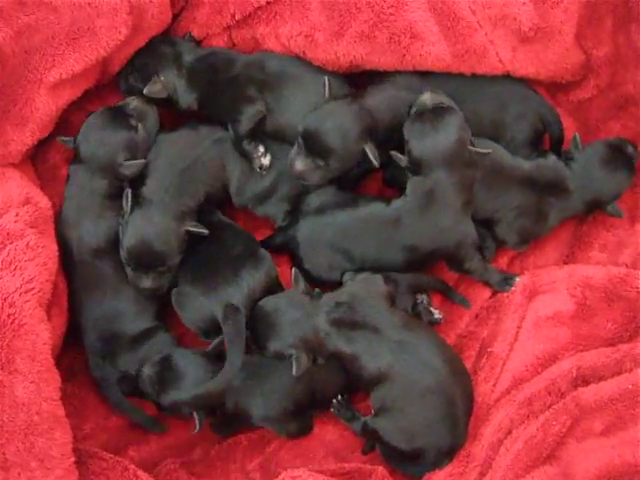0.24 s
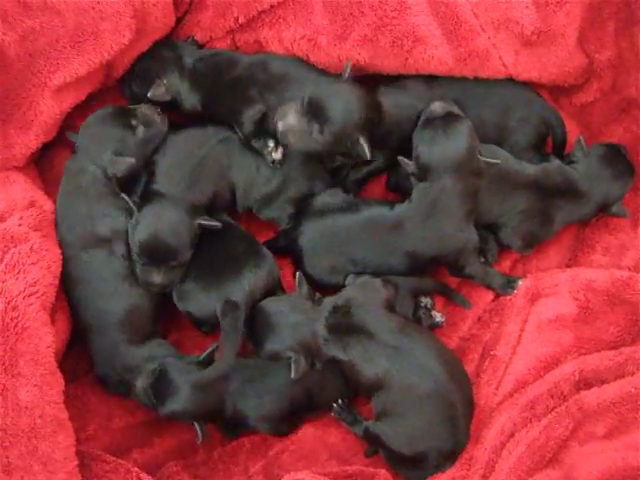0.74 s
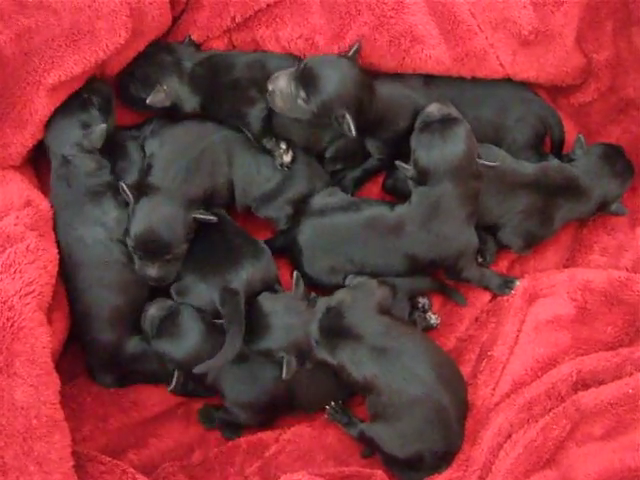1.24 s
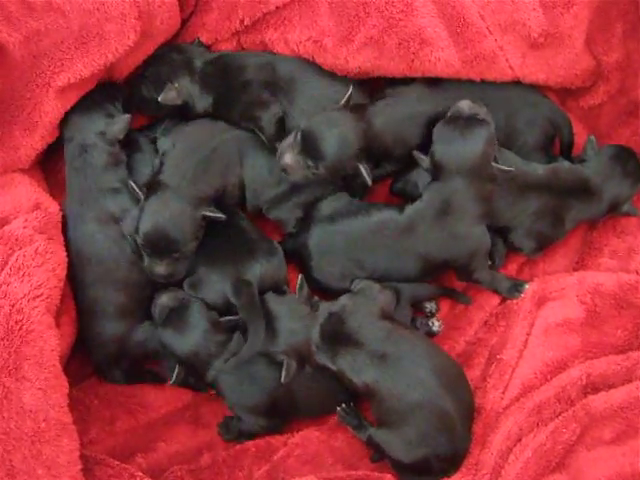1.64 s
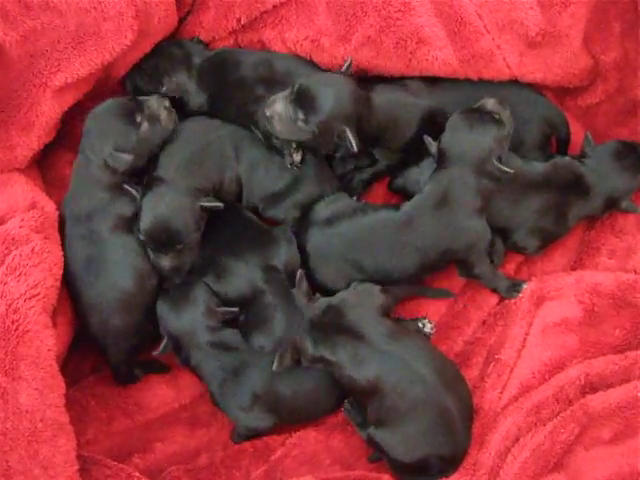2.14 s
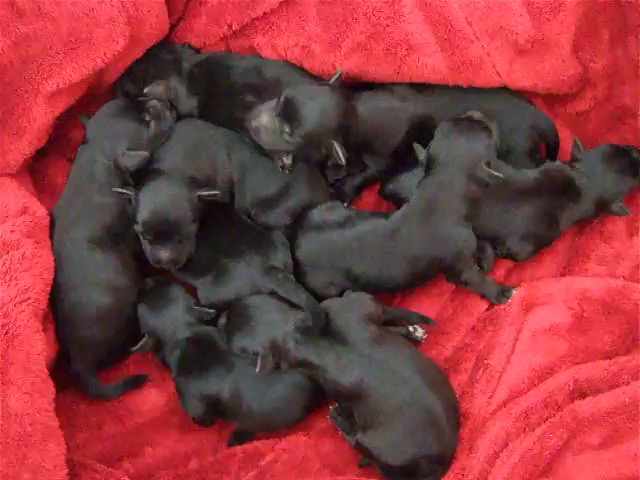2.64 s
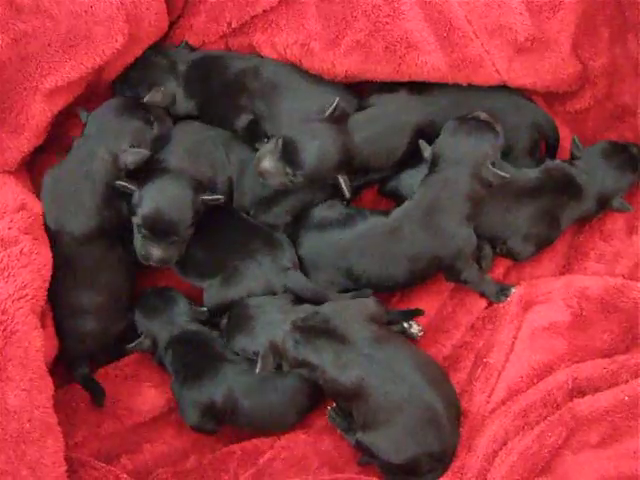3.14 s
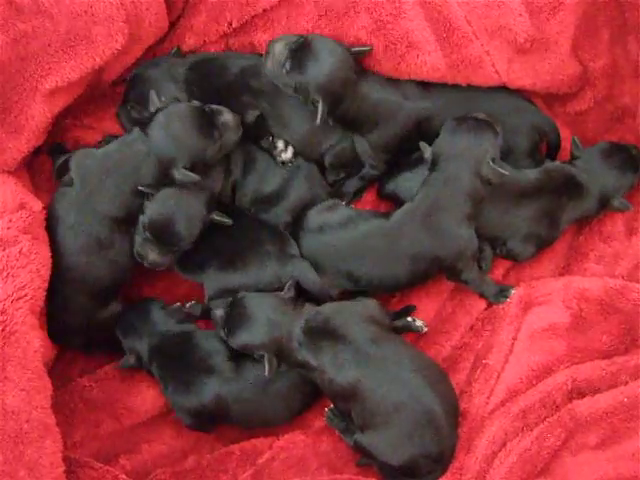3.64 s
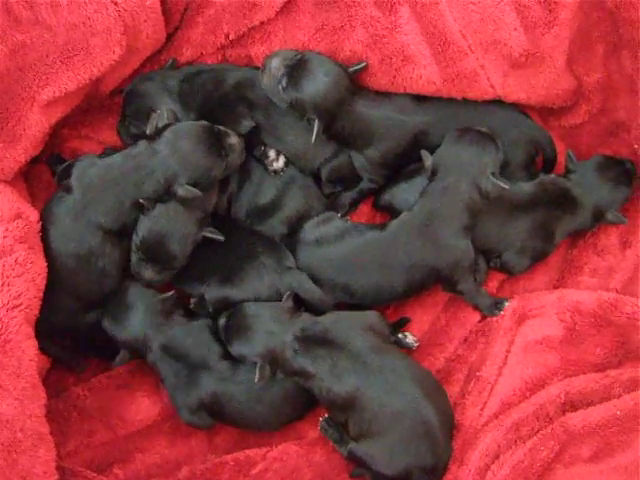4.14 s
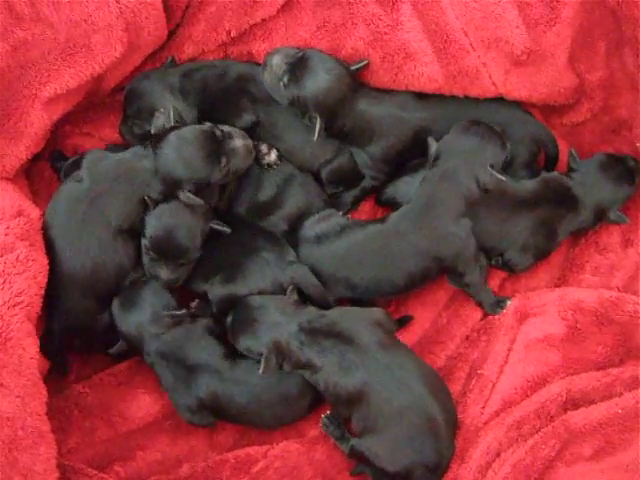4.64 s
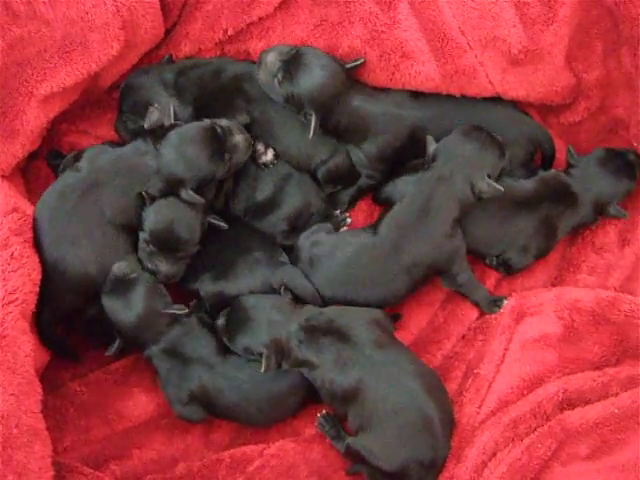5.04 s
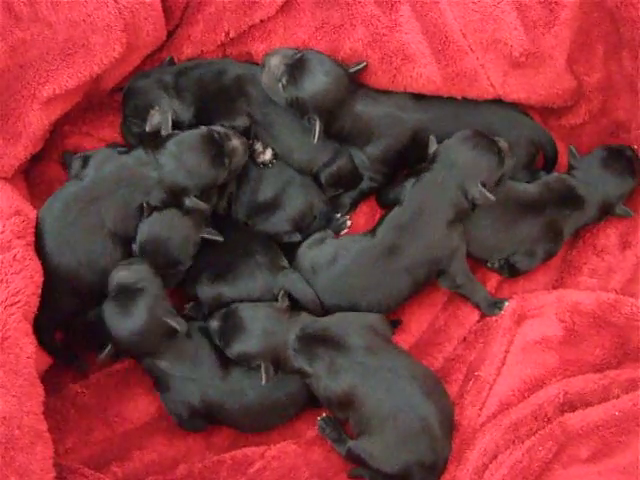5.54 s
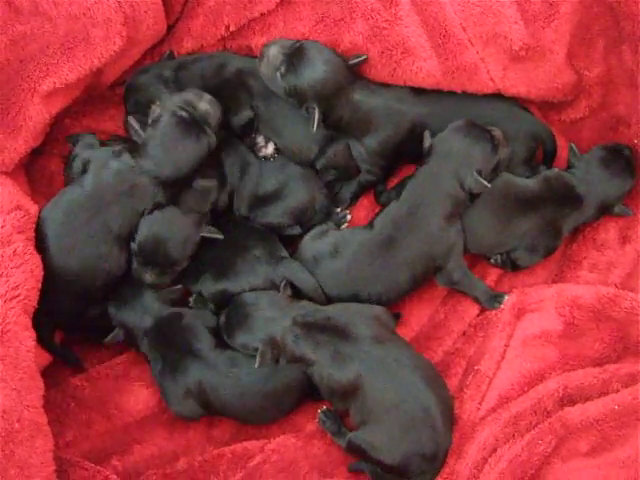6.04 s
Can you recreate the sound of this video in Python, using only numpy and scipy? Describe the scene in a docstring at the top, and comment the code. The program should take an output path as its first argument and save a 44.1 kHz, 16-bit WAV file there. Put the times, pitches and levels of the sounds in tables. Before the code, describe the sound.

A low throbbing fan hum and soft air hiss run throughout a small room. A newborn puppy's thin, high squeal is already sounding at the start, close by, wavering and cracking downward by 0.3 s, with a barely audible wet click. Dull, rough barks from bigger dogs echo farther off at 0.4-0.6 s. Faint fleece brushing follows at 0.8-1.3 s, with a soft body flop at 1.0. A long mewing cry swells from 1.5 to 2.3, gliding down, with tiny mouth clicks near 1.8. A faint short squeak comes at 2.8, then a light rustle at 3.2. A distant bark smears across 3.4-3.9 beneath another falling squeal at 3.7. A brief rising squeak at 4.15 precedes a stronger, longer descending whine from 4.6 to 5.3. Another bark sounds at 5.3, a rising squeal at 5.55-5.85, then sharper far barks at 6.0-6.2 and a last squeal beginning at 6.2.

```python
"""Newborn puppies squeal on a fleece blanket, close to the microphone in a small room with a humming fan.
A cry is already sounding at the start: a thin tone that glides, wavers and cracks, with a faint muzzle ring.
A tiny wet click falls within it, then come dull barks from bigger dogs further off, rough pulses and noise.
Next the litter rustles and one body flops, as shaped noise; after a second and a half the cries resume.
Some later cries carry a brief added tone; barks return in the middle and near the end."""
import sys
import numpy as np
from scipy import signal
from scipy.fft import rfft, irfft
from scipy.io import wavfile
from scipy.ndimage import uniform_filter1d

SR = 44100
rng = np.random.default_rng(int(sys.argv[2]) if len(sys.argv) > 2 else 0)


def inscribe(sig):
    """Save sig as 16-bit PCM at rate SR to the path in sys.argv[1].

    A 1-D sig is mono; a 2-D sig holds one channel per row.
    Samples are clipped to [-1, 1] before scaling.
    """
    pcm = np.round(np.clip(np.atleast_2d(sig).T, -1, 1) * 32767)
    wavfile.write(sys.argv[1], SR, pcm.astype(np.int16))


N = 277816
TIME = np.arange(N) / SR  # seconds

# Steady air of the room. Each row: frequency in Hz, relative level in dB.
AIR_COLOUR = [(110, -44), (180, -7), (261, -9), (292, -7.5), (465, -9.5), (555, -4.5), (729, -5.5),
              (816, -5), (1110, -5), (1200, -9.5), (4420, -17.5), (7750, -18.5), (8400, -27), (10900, -68),
              (18500, -120)]
AIR_DB = -49.5  # middle level of the air, which drifts a little
# The two main tones of the fan. Each row: frequency in Hz, level in dB before throbs and surges.
HUM_TONES = [(55.5, -53.5), (96, -53)]
# Changes of the hum. Each row: start in seconds, length in seconds, rise of the low tone in dB,
# rise of the high tone in dB.
HUM_SURGES = [(0.15, 0.44, 6, 1.5), (1.45, 1.15, 0, 4), (4.008, 0.55, -2, 7.5), (5.1, 0.47, 6, 0)]
# Weaker duct resonances. Each row: frequency in Hz, width of one filter pass in Hz, level in dB.
DUCT_RESONANCES = [(36.6, 6.3, -56), (79.9, 30, -55.5), (117, 18, -55.5), (143.3, 11, -61),
                   (159.7, 12, -60.5), (295.2, 11, -67)]

# The cries. Each row: start in seconds, swell in seconds, peak effort in dB, fade in dB per second,
# mouth closing time in seconds, brightness in dB, throat tuning as a ratio, muzzle resonance at the peak
# in multiples of the pitch, muzzle ring in dB, opening chirp in octaves, final crack in octaves.
CRY_SHAPES = [ (-0.1, 0.22, -23.5, 35.5, 0.1, -11.5, 1.205, 4.0, -32, 0, -0.62),
              (1.525, 0.37, -23.5, 33, 0.09, -1, 1.044, 4.7, -23, 0, 0.22),
              (2.797, 0.031, -38.5, 71, 0.042, -23, 1.04, 4.6, -22, 0.014, -0.9),
              (3.692, 0.03, -29, 23, 0.056, -5.5, 1.005, 6.7, -31, 0.008, -0.35),
              (4.139, 0.076, -28.7, 89, 0.12, -4.5, 1.005, 6.4, -22.5, 0.013, 0.27),
              (4.63, 0.18, -23.5, 17, 0.041, 1.5, 1.005, 4.9, -23, 0.62, 0.09),
              (5.548, 0.074, -27, 81, 0.25, 3.5, 1.053, 6.0, -26, 0.06, 0.2),
              (6.162, 0.049, -27, 57, 0.076, -5, 1.024, 6.2, -28.5, 0.064, 0), ]
# Melodies, one list a cry. Each row: time in seconds, pitch in Hz before chirp, crack and waver.
CRY_MELODIES = [
    [(0.0, 1760), (0.022, 1743), (0.062, 1561), (0.128, 1485), (0.17, 1633), (0.212, 1702), (0.232, 1671),
     (0.256, 1546)],
    [(1.535, 1598), (1.551, 1625), (1.571, 1457), (1.607, 1251), (1.637, 1161), (1.663, 1118),
     (1.707, 1101), (1.763, 1206), (1.811, 1233), (1.969, 1159), (2.087, 1048), (2.179, 1106),
     (2.199, 1069), (2.251, 1100), (2.29, 964)],
    [(2.8, 1555), (2.836, 1420), (2.898, 1570), (2.935, 1434)],
    [(3.697, 1398), (3.711, 1208), (3.733, 1203), (3.765, 1070), (3.823, 1013), (3.859, 880), (3.875, 882)],
    [(4.143, 1300), (4.161, 1131), (4.237, 1241), (4.271, 1342), (4.329, 1315), (4.35, 1414)],
    [(4.635, 1395), (4.665, 1339), (4.771, 1253), (4.801, 1267), (4.893, 1244), (4.949, 1200), (5.089, 968),
     (5.129, 953), (5.171, 995), (5.203, 981), (5.221, 961), (5.261, 953), (5.277, 861), (5.285, 849)],
    [(5.55, 910), (5.618, 1045), (5.65, 1075), (5.706, 1177), (5.77, 1124), (5.85, 1343)],
    [(6.165, 1210), (6.181, 1121), (6.193, 1099), (6.3, 1230)],
]
# Where the voice turns hoarse. Each row: middle in seconds, length in seconds, roughness from 0 to 1.
HOARSE_SPOTS = [(0.263, 0.02, 0.7), (2.057, 0.3, 0.02), (2.303, 0.019, 0.55), (2.949, 0.02, 0.2),
                (3.876, 0.044, 0), (5.02, 0.046, 0.07), (5.274, 0.033, 0.3)]
# Colour of a puppy's throat before tuning. Each row: frequency in Hz, level in dB.
PUPPY_THROAT = [(800, -6.5), (1100, 0.5), (1225, -6.5), (1380, -0.5), (1650, 1.5), (2100, 6), (2530, 12),
                (2790, 4.5), (3050, 6), (3700, -3), (4300, -4.5), (5100, -14.5)]
# Fixed colour of the nasal passage, with its notch. Each row: frequency in Hz, level in dB.
NOSE_COLOUR = [(4700, 0), (5200, -11), (5700, 0), (6400, 1), (7400, -3), (8600, -13)]
SWELL_DB = 14  # how far the effort rises from the start of a cry to its peak
FOLDS_DB_PER_OCTAVE = -8.5  # slope of the harmonics at the vocal folds
SECOND_SHARE = 0.3  # share of the third harmonic's brightening that reaches the second
OPEN_S, SHUT_DB = 0.031, -12  # time for the mouth to open; shut, it dulls the voice
MUZZLE_SAG_PER_DB = 0.52  # the muzzle resonance sinks as effort ebbs: multiples of the pitch per dB
CHIRP_S = 0.005  # a cry may start too high and drop onto its melody this fast
# After its melody the voice cracks: length, time to reach the new pitch, change of level.
CRACK_S, CRACK_GLIDE_S, CRACK_DB = 0.021, 0.007, -2

# Tiny wet clicks of tongue and lips. Each row: start in seconds, level in dB.
MOUTH_CLICKS = [(0.072, -56), (1.762, -40.5), (1.844, -36)]
# Colour of the clicks. Each row: frequency in Hz, relative level in dB.
CLICK_COLOUR = [(1000, -12), (3000, 3.5), (4200, -1.5), (5500, -5), (7200, -9.5), (9000, -19)]

# Far barks. Each row: start in seconds, length in seconds, fade-in and fade-out time in seconds,
# pitch in Hz before jitter, level in dB before decay and distance, brightness of the open mouth in dB per octave.
FAR_BARKS = [(0.385, 0.032, 0.02, 410, -36, 0), (0.427, 0.035, 0.0014, 417, -35, -6),
             (0.45, 0.15, 0.028, 388, -40, -3), (3.43, 0.44, 0.037, 405.6, -41, 1),
             (5.3, 0.17, 0.016, 383.3, -40.5, -1), (6.032, 0.17, 0.044, 398.8, -36.5, 4),
             (6.106, 0.08, 0.0041, 422.4, -28.5, -7)]
# Resonances of the barking throat. Each row: frequency in Hz, width of one filter pass in Hz,
# level in dB before the brightness.
BIG_THROAT = [(833, 126, -0.5), (1023, 240, 1.5), (1770, 340, -10), (2300, 230, -13.5)]

# Paws and noses brushing the fleece. Each row: start in seconds, length in seconds, level in dB.
BRUSHES = [(0.785, 0.033, -46), (1.012, 0.0083, -42), (1.04, 0.0072, -48), (1.248, 0.07, -48.5),
           (2.543, 0.01, -45), (3.23, 0.018, -47.5), (5.441, 0.029, -44.5)]
# Colour of the brushing. Each row: frequency in Hz, relative level in dB.
BRUSH_COLOUR = [(150, 16.5), (500, -23), (1100, 13), (2200, 3), (4300, 1.5), (5600, -4.5), (7300, -21),
                (9000, -34)]
# A body flops on the blanket: start in seconds, length in seconds.
BODY_FLOP = (1.033, 0.03)

# Added tones within some cries: a cracked low note, an undertone or a high whistle. Each row: start in
# seconds, length in seconds, pitch in Hz before waver, end pitch in Hz before waver, level in dB.
ADDED_TONES = [(1.67, 0.13, 586, 606, -47), (2.06, 0.069, 636, 656.5, -46), (2.182, 0.05, 7570, 7400, -48),
               (2.944, 0.023, 930, 840, -45), (3.7, 0.034, 6080, 6000, -53),
               (3.753, 0.067, 7560, 7100, -57), (4.143, 0.075, 733, 703, -43),
               (4.638, 0.075, 734, 730, -51.5)]

# First reflections from the walls. Each row: delay in seconds, level in dB.
WALL_ECHOES = [(0.0107, -41), (0.027, -22)]
ROOM_T60_S, ROOM_DB = 0.38, -11.5  # time for the room to fade by 60 dB, and its level
TOP_HZ = 8300  # the recorder keeps little above this


def undb(db):
    """Turn decibels into gain."""
    return 10 ** (np.asarray(db) / 20)


def unit(x):
    """Scale to an average strength (rms) of 1."""
    return x / np.sqrt(np.mean(x ** 2) + 1e-20)


def colour_db(hz, points):
    """Read a level between (Hz, dB) points, spacing frequency as the ear does, by ratio."""
    f, db = np.transpose(points)
    return np.interp(np.log(hz + 1), np.log(f), db)


def coloured(points):
    """Shape noise to the given spectrum, with rms 1."""
    spectrum = rfft(rng.standard_normal(N))
    gain = undb(colour_db(np.fft.rfftfreq(N, 1 / SR), points))
    return unit(irfft(spectrum * gain, N))


def resonate(x, hz, width):
    """Ring at one frequency, filtering twice for steep sides."""
    b, a = signal.iirpeak(hz, hz / width, fs=SR)
    once = signal.lfilter(b, a, x)
    return signal.lfilter(b, a, once)


def walk(rate):
    """Wander smoothly and randomly with rms 1, towards about rate new values a second."""
    k = max(int(SR / rate), 2)
    steps = np.repeat(rng.standard_normal(N // k + 1), k)
    return unit(uniform_filter1d(steps, k)[:N])


def swell(start, length):
    """Rise from 0 to 1 and fall back in one rounded arch."""
    u = np.clip((TIME - start) / length, 0, 1)
    return 4 * u * (1 - u)


def glide(rows, t):
    """Join (s, value) points by rounded arcs that level off at each turning point."""
    s, v = np.transpose(rows)
    span = np.maximum(np.diff(s), 1e-4)
    chord = np.diff(v) / span
    before, after = np.r_[0, chord], np.r_[chord, 0]
    slope = 2 * np.maximum(before * after, 0) / (before + after + 1e-9)
    i = np.clip(np.searchsorted(s, t) - 1, 0, len(s) - 2)
    u = np.clip((t - s[i]) / span[i], 0, 1)
    bow = (1 - u) * (slope[i] - chord[i]) - u * (slope[i + 1] - chord[i])
    return v[i] + span[i] * u * (chord[i] + (1 - u) * bow)


def tail(x, t60):
    """Blur a sound with fading noise, like many overlapping reflections, of unit energy gain."""
    t = TIME[:SR]
    build_up = np.clip(t / 0.022, 0, 1)
    response = rng.standard_normal(SR) * np.exp(-np.log(1000) * t / t60) * build_up
    return signal.fftconvolve(x, response / np.linalg.norm(response))[:N]


def fan(drift_hz=2.6, throb_db=3.0):
    """Two low tones throb and surge, and noise rumbles in the duct under a nearly even hiss of air."""
    out = undb(AIR_DB + 0.69 * walk(3.2)) * coloured(AIR_COLOUR)
    surge_db = sum(np.outer(rise_db, swell(s, length)) for s, length, *rise_db in HUM_SURGES)
    for (hz, db), rise_db in zip(HUM_TONES, surge_db):
        phase = 2 * np.pi * np.cumsum(hz + drift_hz * walk(25)) / SR
        level = undb(db + rise_db + throb_db * walk(26))
        out += level * np.sqrt(2) * np.sin(phase)
    for hz, width, db in DUCT_RESONANCES:
        out += undb(db) * unit(resonate(rng.standard_normal(N), hz, width))
    return out


def squeals(waver=0.0022, jitter=0.00066, shimmer_db=0.56, rasp_jitter=0.14, muzzle_width_hz=1800,
            flicker_db=3, flutter_db=1.5, break_hz_per_s=50000, fade_s=0.0027):
    """Tiny vocal folds make three strong harmonics and faint muzzle overtones, uneven where hoarse."""
    rough = sum(r * swell(s - length / 2, length) for s, length, r in HOARSE_SPOTS)
    wobble = 1 + waver * walk(60) + (jitter + rasp_jitter * rough) * walk(700)
    tremor = undb(shimmer_db * walk(70)) * (1 + rough * walk(500))
    lower, upper = np.arange(1, 4)[:, None], np.arange(4, 9)[:, None]  # harmonic numbers
    flicker = undb(flicker_db * np.array([walk(18) for _ in upper]))
    flutter = flutter_db * np.array([walk(40) for _ in lower])
    out = np.zeros(N)
    for melody, cry in zip(CRY_MELODIES, CRY_SHAPES):
        (start, swell_s, peak_db, fade_db_per_s, close_s, bright_db,
         tuning, muzzle, ring_db, chirp, crack) = cry
        crack_at = melody[-1][0]
        end = crack_at + CRACK_S
        on = (TIME >= start) & (TIME <= end)
        t = TIME[on]
        age, left = t - start, end - t
        cracked = np.clip((t - crack_at) / CRACK_GLIDE_S, 0, 1)
        bend_octaves = chirp * np.exp(-age / CHIRP_S) + crack * cracked
        pitch = glide(melody, t) * 2 ** bend_octaves
        hz = pitch * wobble[on]
        phase = 2 * np.pi * np.cumsum(hz) / SR
        # effort rises to a rounded peak, then ebbs as the air runs out
        rise_db = SWELL_DB * np.maximum(1 - age / swell_s, 0) ** 2
        ebb_db = fade_db_per_s * np.maximum(age - swell_s, 0)
        effort_db = peak_db - rise_db - ebb_db
        # the harmonics slide through the throat's fixed colour; the higher ones need an open mouth
        mouth = np.clip(np.minimum(age / OPEN_S, left / close_s), 0, 1)
        body_db = FOLDS_DB_PER_OCTAVE * np.log2(lower) + flutter[:, on]
        body_db += colour_db(lower * hz / tuning, PUPPY_THROAT)
        body_db += np.outer([0, SECOND_SHARE, 1], bright_db + SHUT_DB * (1 - mouth))
        # the overtone nearest to the muzzle resonance is favoured, then the nose colours it
        centre = muzzle - MUZZLE_SAG_PER_DB * (peak_db - effort_db)
        distance = 2 * (upper - centre) * hz / muzzle_width_hz
        ring = undb(colour_db(upper * hz, NOSE_COLOUR)) / (1 + distance ** 2)
        ring = flicker[:, on] * undb(ring_db) * ring / np.linalg.norm(ring, axis=0)
        gains = [*undb(body_db), *ring]
        voice = np.sqrt(2) * sum(g * np.sin(k * phase) for k, g in enumerate(gains, 1))
        # the tone weakens for an instant where the voice jumps in pitch
        hold = 1 / np.hypot(1, np.gradient(pitch, t) / break_hz_per_s)
        edges = np.clip(np.minimum(age, left) / fade_s, 0, 1)
        out[on] += voice * undb(effort_db + CRACK_DB * cracked) * hold * tremor[on] * edges
    return out


def smacks(length_s=0.0047):
    """The wet mouth opens with brief bright clicks, made of short arches of noise."""
    touch = sum(undb(db) * swell(s, length_s) for s, db in MOUTH_CLICKS)
    return touch * coloured(CLICK_COLOUR)


def barks(jitter=0.039, noise_share=0.6, decay_s=0.19, hall_t60=0.78, hall_db=-4, direct_db=-2):
    """Harsh, uneven pulses and noise ring a big throat; each bark fades and distance smears it."""
    out, wobble, hiss = np.zeros(N), 1 + jitter * walk(200), rng.standard_normal(N)
    for s, length, attack, hz, db, tilt_db in FAR_BARKS:
        # one pulse each time the count of cycles passes a whole number
        pulses = np.diff(np.floor(np.cumsum(hz * wobble) / SR), prepend=0)
        source = unit(pulses) + noise_share * hiss
        voice = np.zeros(N)
        for f, width, level_db in BIG_THROAT:
            voice += undb(level_db + tilt_db * np.log2(f / hz)) * resonate(source, f, width)
        age = np.maximum(TIME - s, 0)
        gate = np.clip(np.minimum(age, length - age) / attack, 0, 1)
        out += undb(db) * unit(voice) * gate * np.exp(-age / decay_s)
    return undb(direct_db) * out + undb(hall_db) * tail(out, hall_t60)


def rustles(grain_db=3, flop_hz=240, flop_width_hz=200, flop_db=-50):
    """Paws and noses brush the fleece as short grainy noise, and one body flops with a soft low thud."""
    touch = sum(undb(db) * swell(s, length) for s, length, db in BRUSHES)
    brushing = touch * coloured(BRUSH_COLOUR) * undb(grain_db * walk(500))
    thud = unit(resonate(rng.standard_normal(N), flop_hz, flop_width_hz))
    return brushing + undb(flop_db) * swell(*BODY_FLOP) * thud


def added_tones(waver_hz=10):
    """An added tone sounds briefly within some cries: a cracked low note, an undertone or a high whistle."""
    out, wobble = np.zeros(N), waver_hz * walk(150)
    for s, length, hz, end_hz, db in ADDED_TONES:
        pitch = np.interp(TIME, [s, s + length], [hz, end_hz]) + wobble
        tone = np.sqrt(2) * np.sin(2 * np.pi * np.cumsum(pitch) / SR)
        out += undb(db) * swell(s, length) * tone
    return out


def scene():
    """The litter is heard directly, off the nearest walls and in a short room tail, with barks and fan."""
    litter = squeals() + smacks() + rustles() + added_tones()
    walls = sum(undb(db) * np.interp(TIME - lag, TIME, litter, left=0) for lag, db in WALL_ECHOES)
    room = undb(ROOM_DB) * tail(litter, ROOM_T60_S)
    return (litter + walls + room + barks() + fan())[None]


def record(dry):
    """The recorder cuts the top steeply with a low-pass filter."""
    top_cut = signal.cheby1(14, .1, TOP_HZ, fs=SR, output="sos")
    return signal.sosfilt(top_cut, dry)


dry = scene()
out = record(dry)
inscribe(out)
```